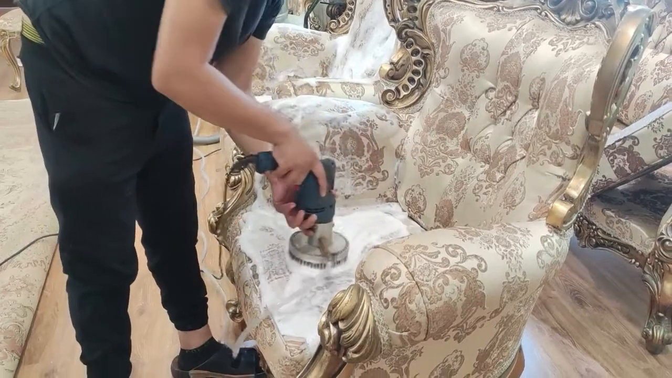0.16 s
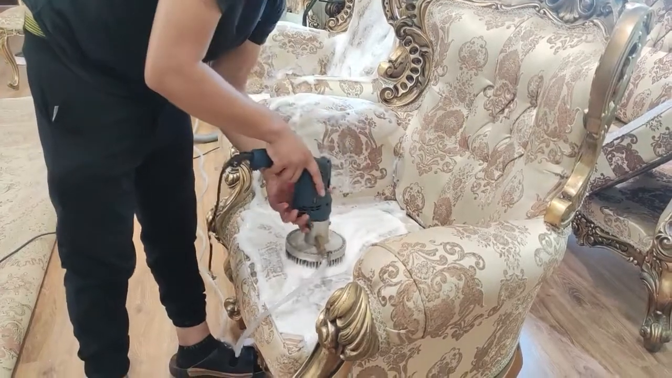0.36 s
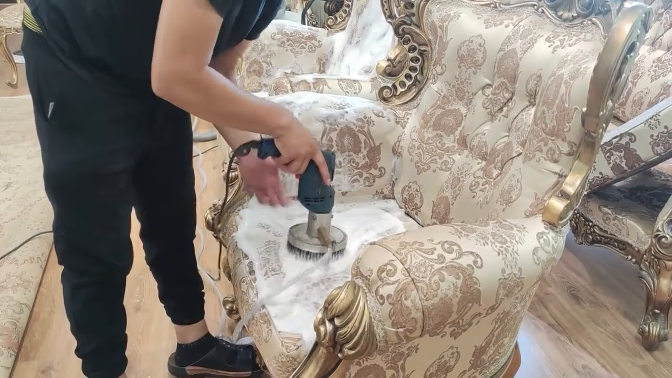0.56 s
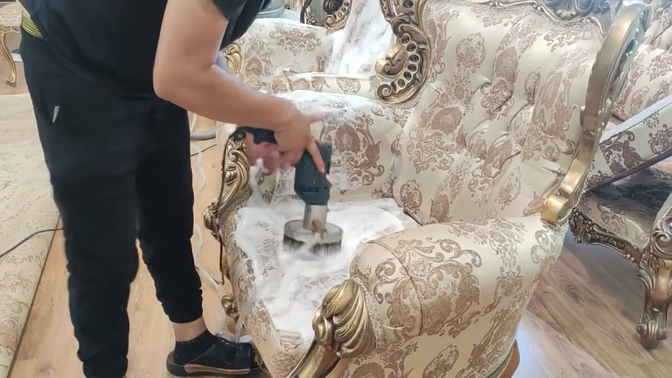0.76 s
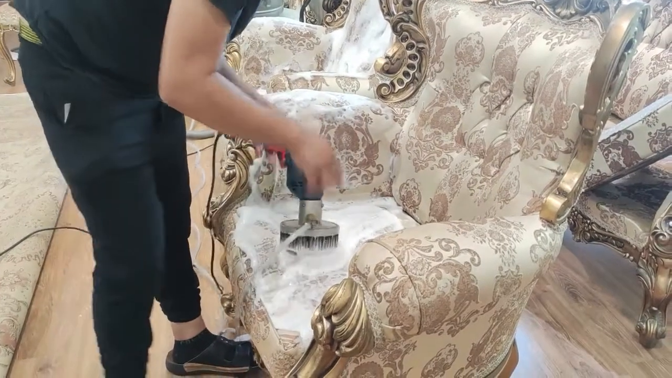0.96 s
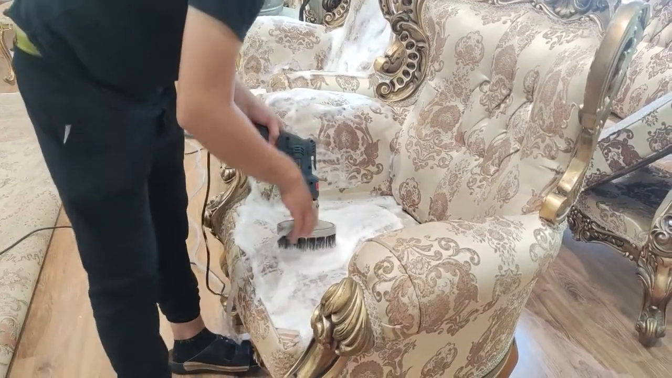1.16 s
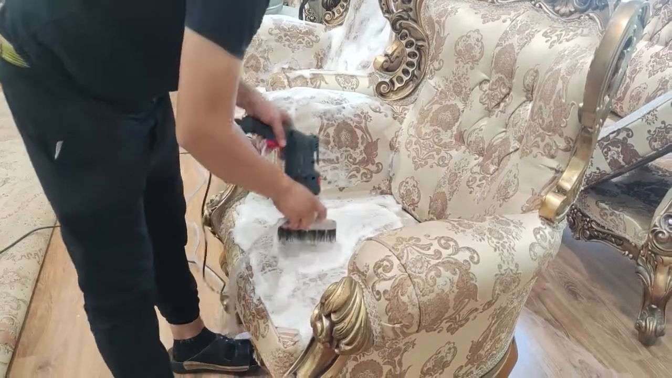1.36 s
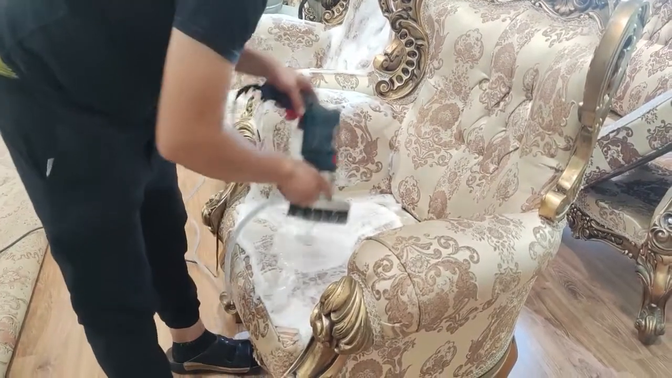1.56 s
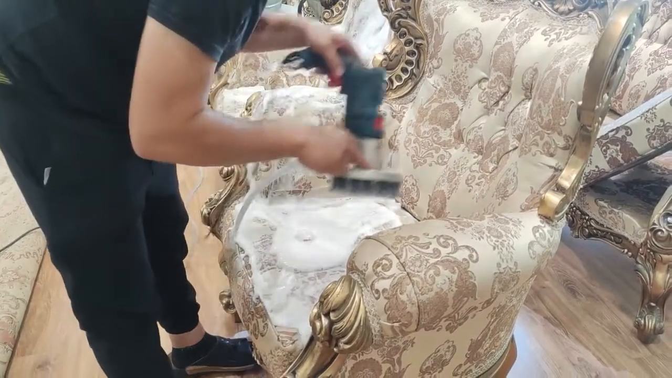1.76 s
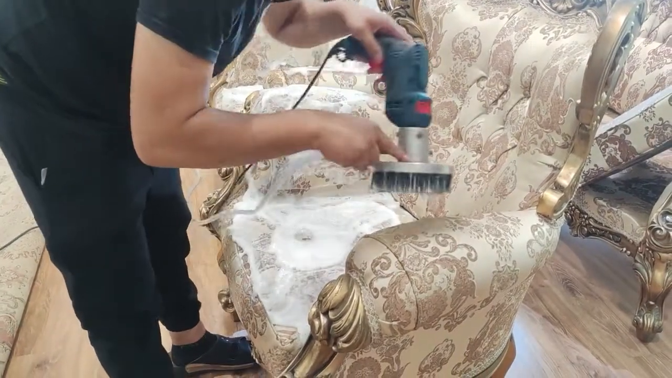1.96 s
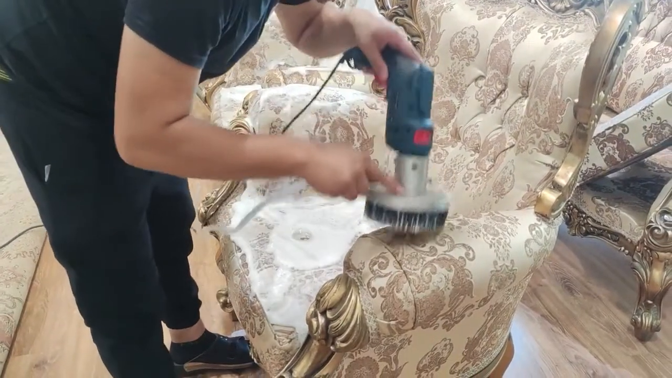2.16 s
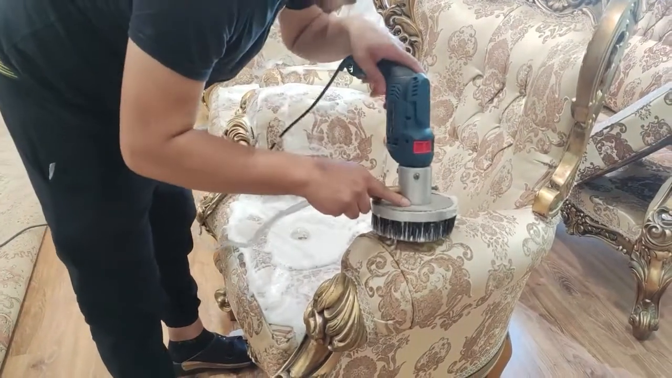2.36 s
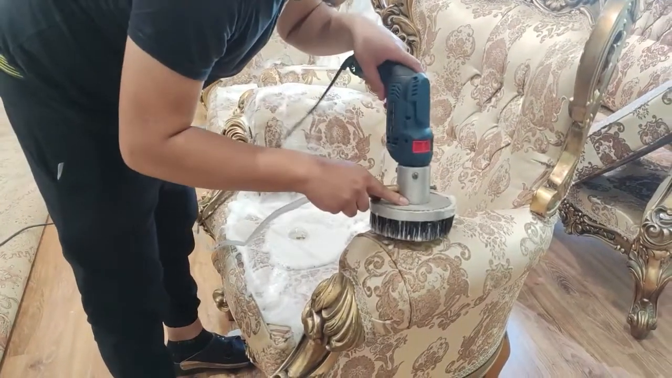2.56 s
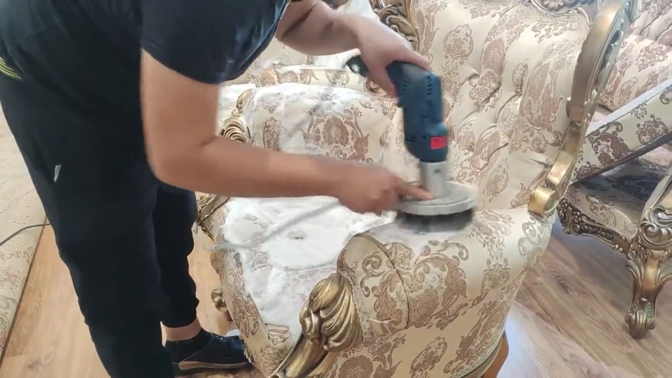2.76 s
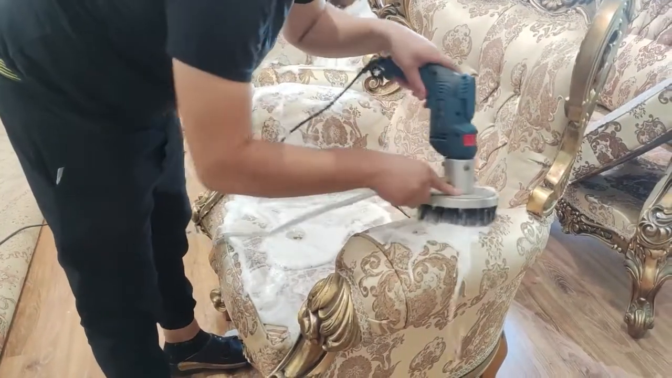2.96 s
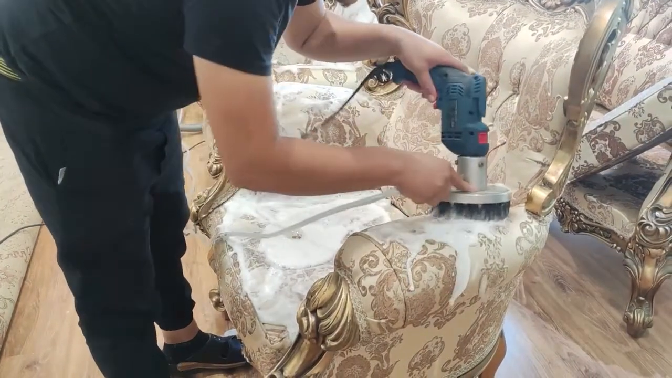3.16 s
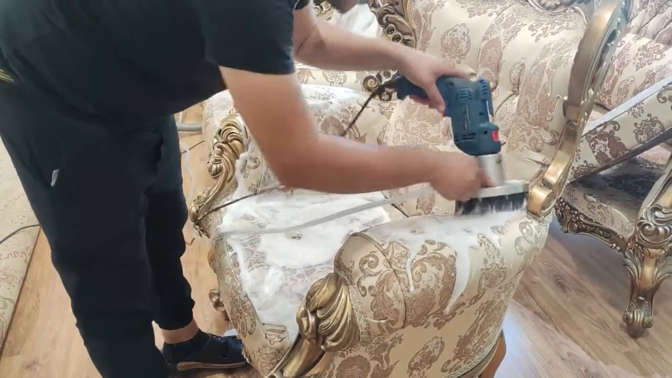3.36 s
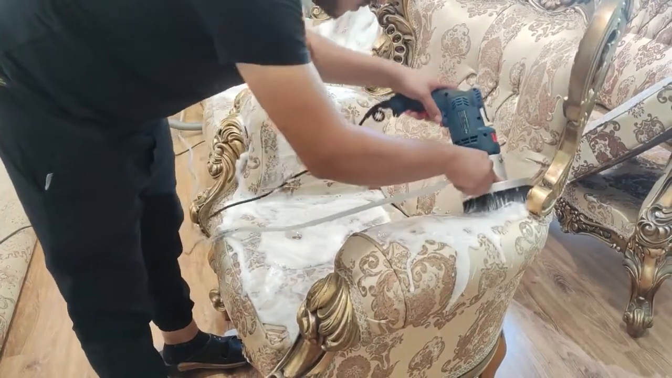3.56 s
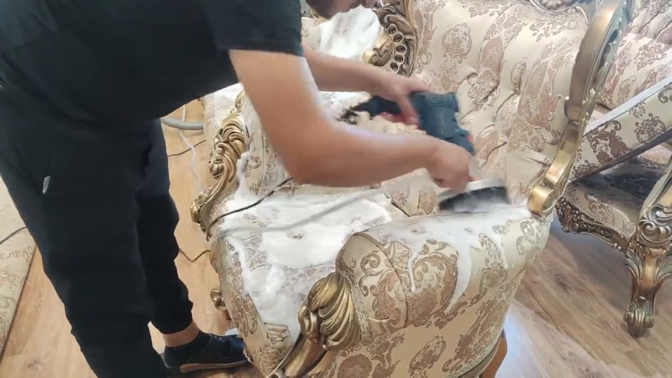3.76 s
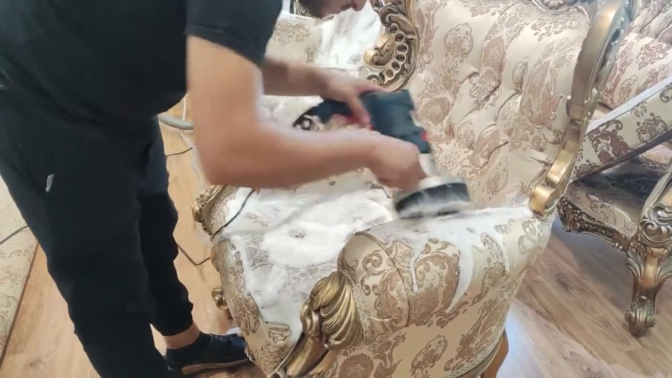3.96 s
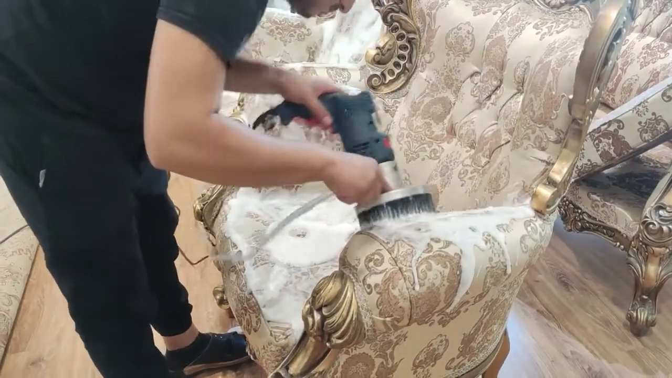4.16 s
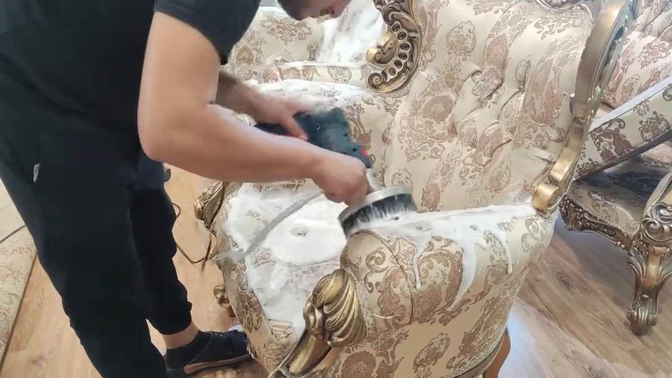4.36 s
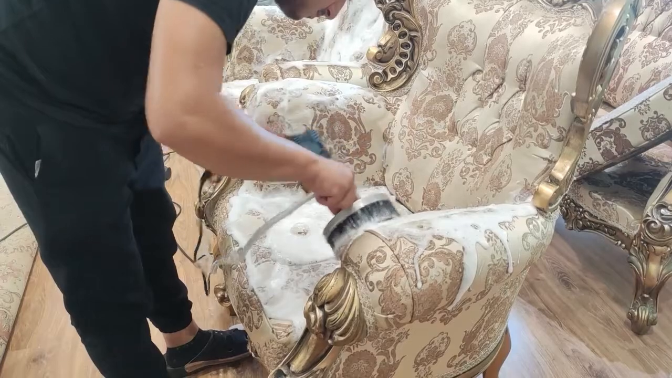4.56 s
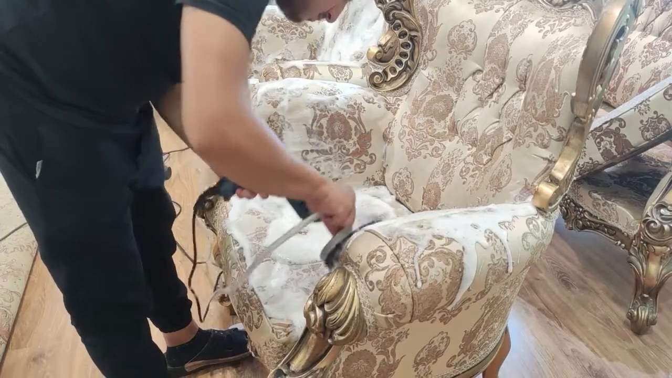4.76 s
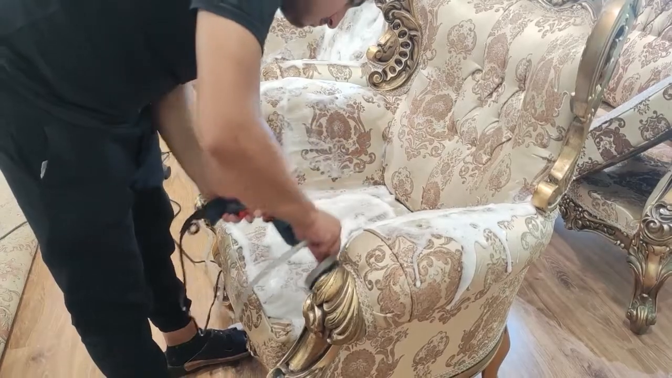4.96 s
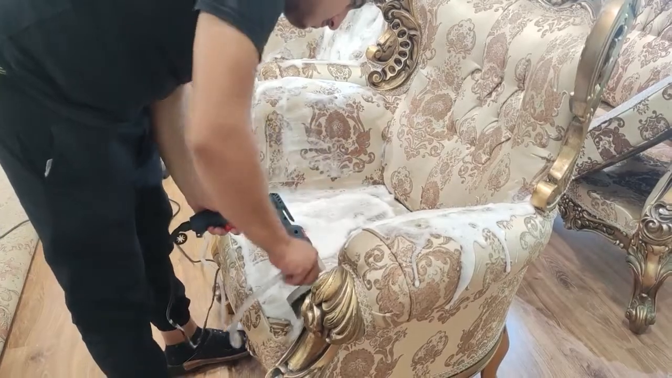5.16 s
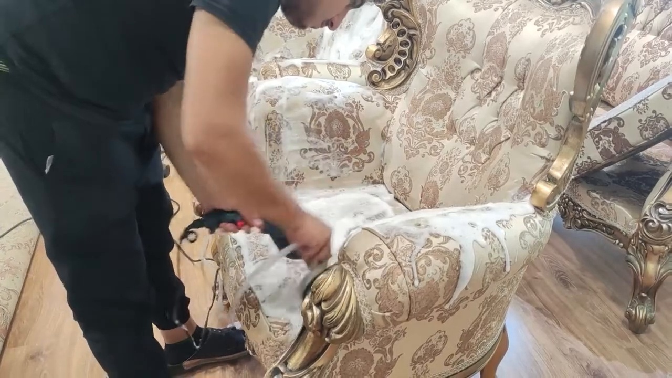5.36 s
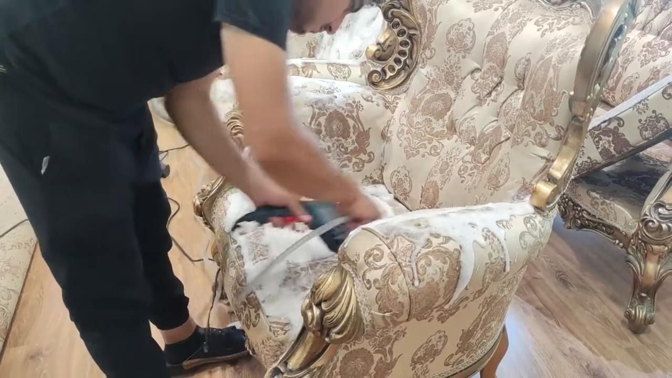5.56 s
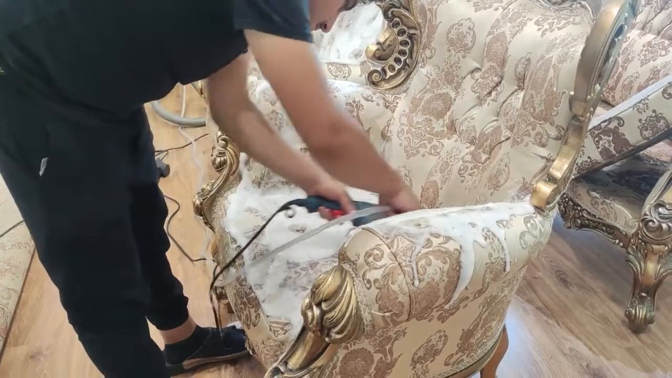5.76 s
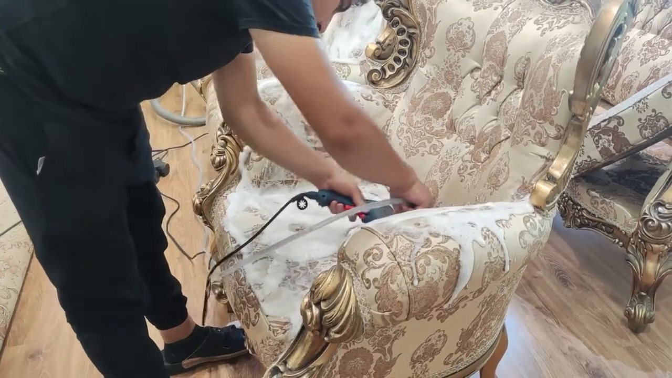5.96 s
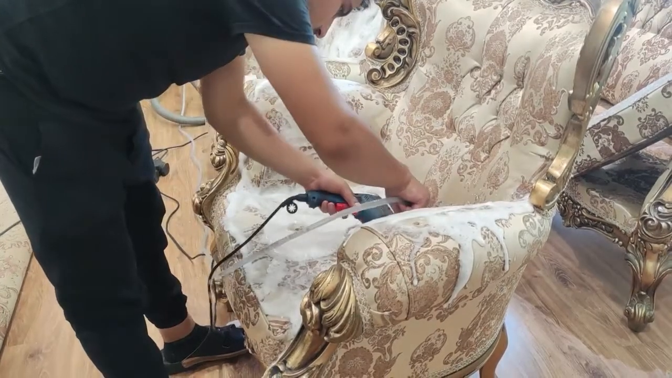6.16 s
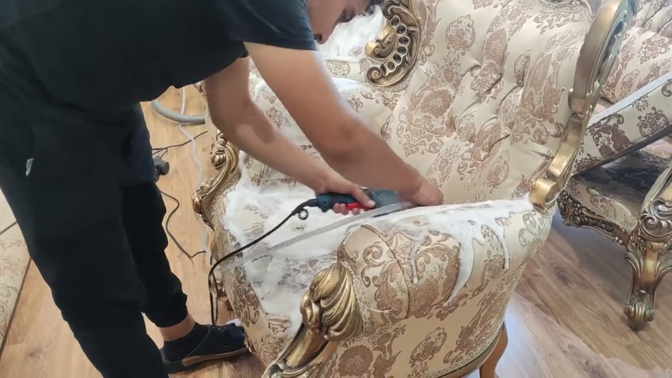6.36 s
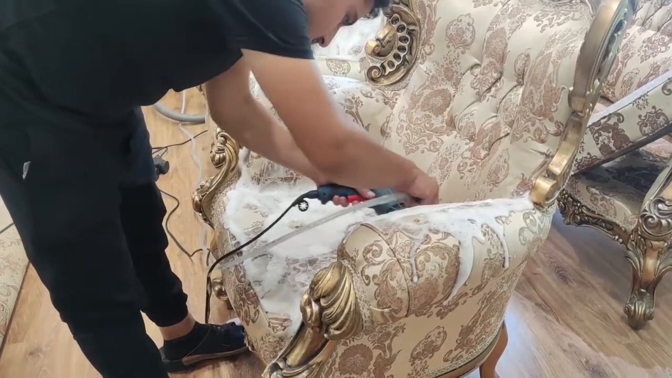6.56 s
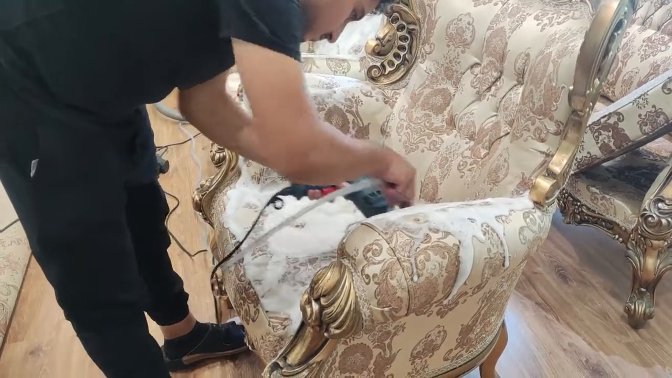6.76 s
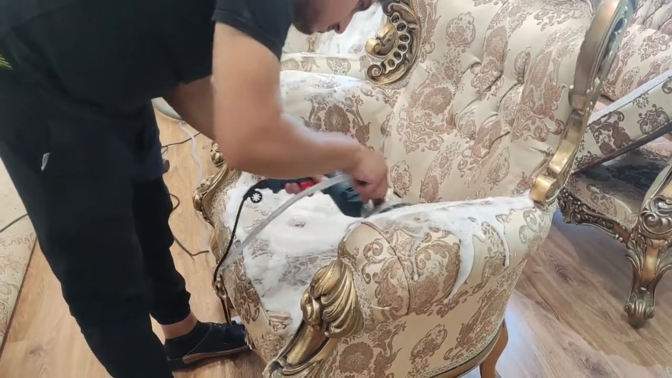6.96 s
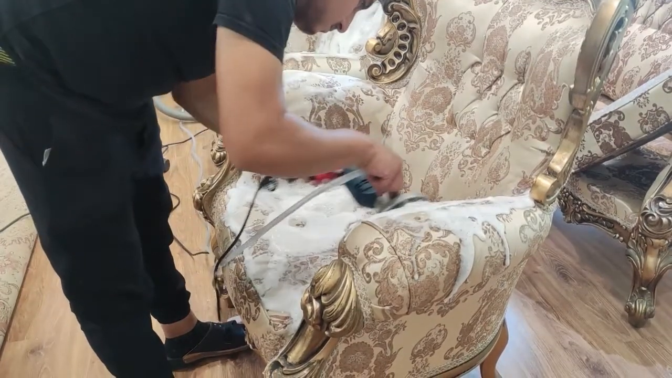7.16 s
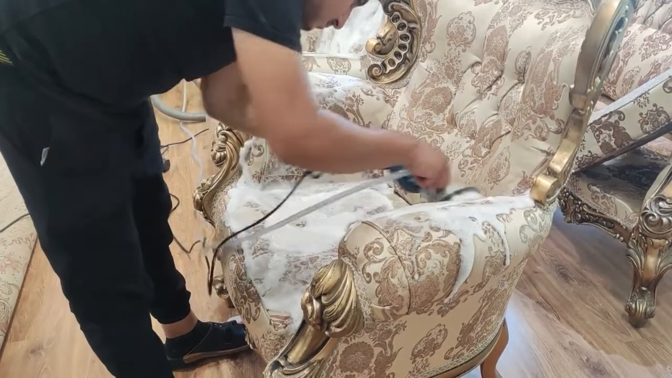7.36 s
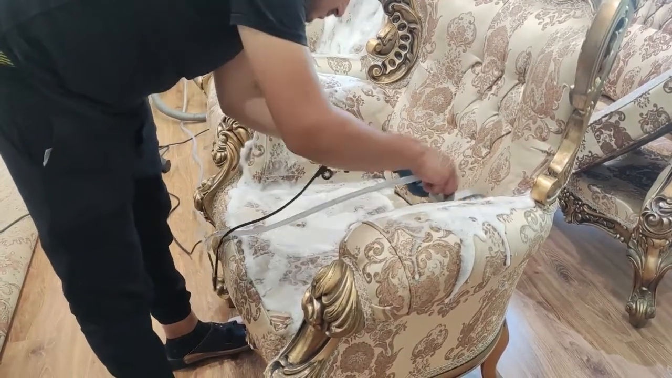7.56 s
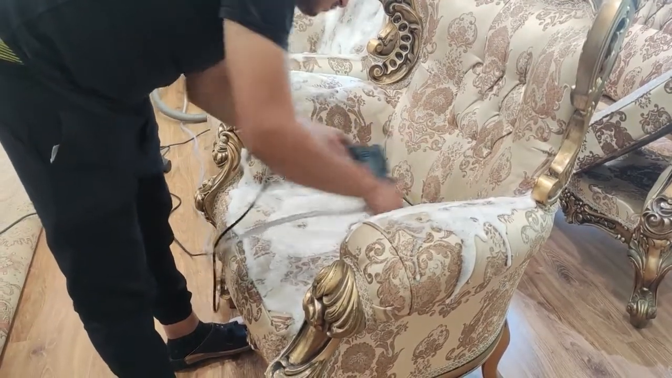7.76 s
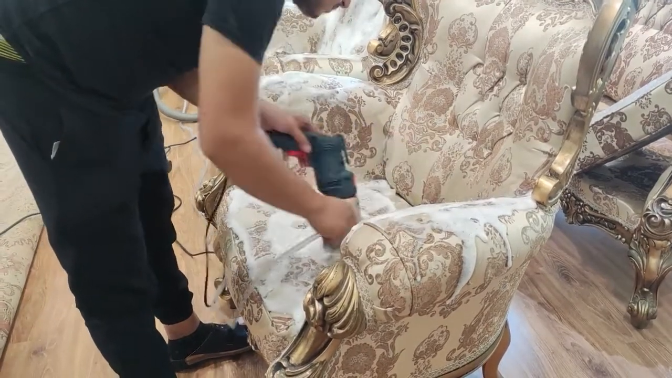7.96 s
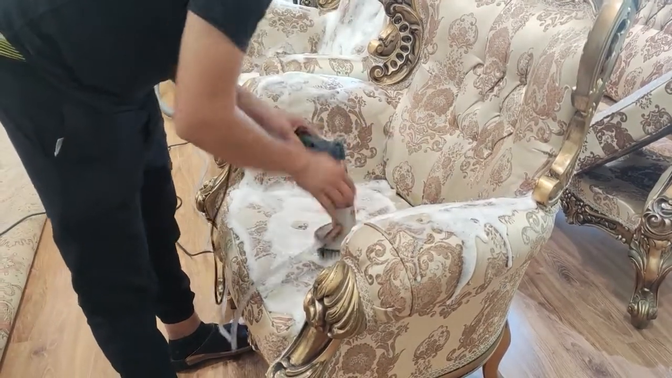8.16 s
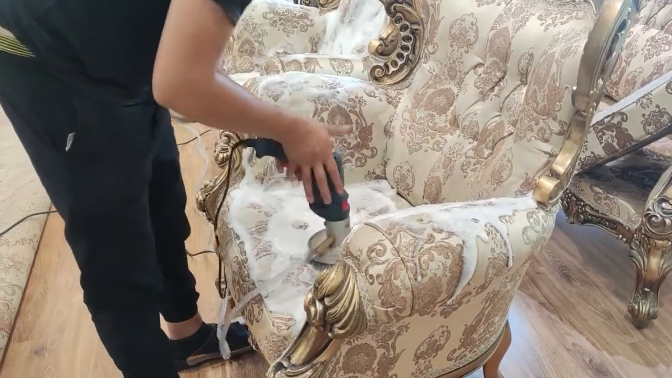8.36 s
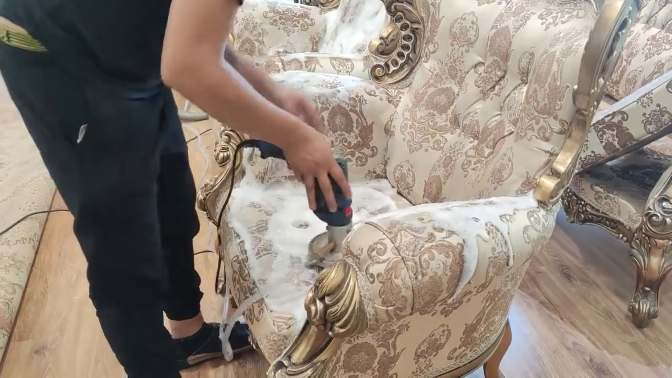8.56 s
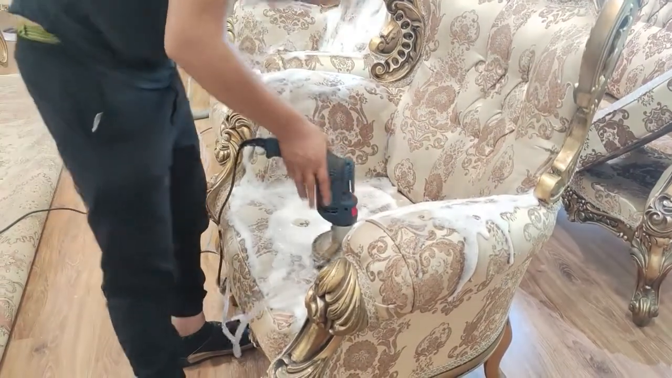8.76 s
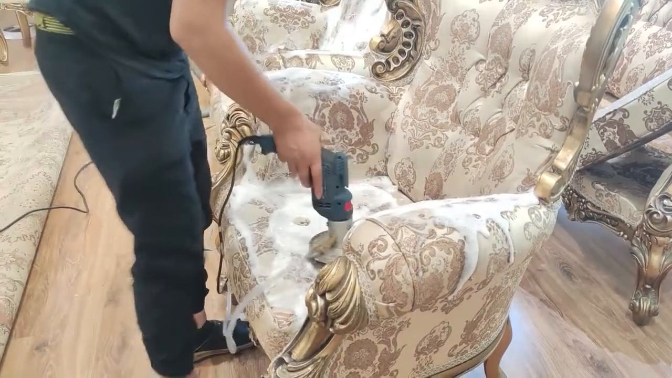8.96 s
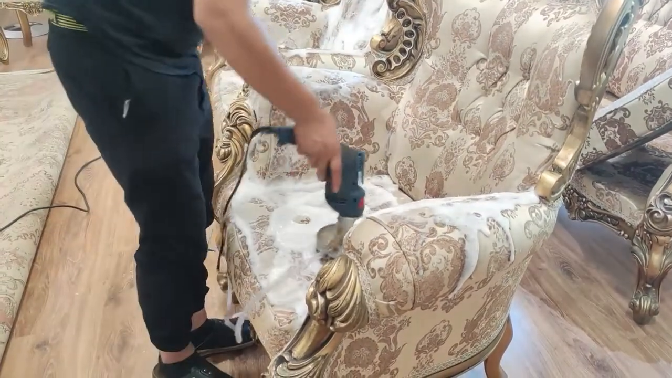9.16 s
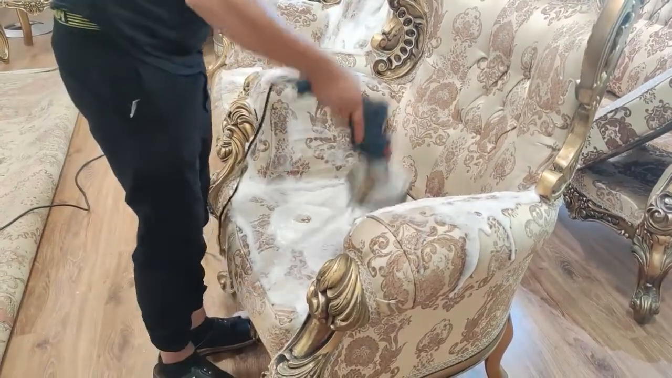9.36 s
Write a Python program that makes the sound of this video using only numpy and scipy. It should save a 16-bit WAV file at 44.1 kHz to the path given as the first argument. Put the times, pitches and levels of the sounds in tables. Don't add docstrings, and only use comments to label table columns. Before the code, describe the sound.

Close whirring electric drill with rough gear whine and bristle hiss slows to rest, pauses, starts again, wavers in pitch and finally coasts out.

```python
import sys
import numpy as np
from scipy import signal
from scipy.fft import rfft, irfft
from scipy.io import wavfile
from scipy.ndimage import uniform_filter1d

SR = 44100
rng = np.random.default_rng(int(sys.argv[2]) if len(sys.argv) > 2 else 0)


def dump_mix(stems):
    frames = np.atleast_2d(stems).T
    limited = np.clip(frames, -1, 1)
    pcm = np.round(limited * 32767).astype(np.int16)
    wavfile.write(sys.argv[1], SR, pcm)


def field_ratio(decibels):
    return 10 ** (np.asarray(decibels, dtype=float) / 20)


N = 414540

# t/s, angle/turns
TIGHT_SPOT = [(0, .43), (.7, .41), (1.3, .27), (3.2, -.11), (5, .08), (6.1, .08), (7, .3), (8.7, .4)]
# f/Hz, level/dB per Hz
HISS_SPECTRUM = [(410, -52), (700, -21), (850, -16.5), (956, -12), (1090, -12.5), (1410, -8), (1810, -5),
                 (3110, -8.5), (5440, -7), (7720, 0), (11100, -17), (13700, -17), (15600, -24.5)]
# f/Hz, level/dB per Hz
CUSHION_SPECTRUM = [(24, -43), (40, -18), (204, -12), (330, -2.5), (521, -7), (694, -3.5), (843, -4),
                    (900, -10), (1170, -33), (1980, -120)]
# f/Hz, width/Hz, level/dB
HOUSING_MODES = [(720, 227, -9), (1024.6, 90, 2.5), (1100, 206, 5.5), (1258, 29, 5.5), (1490, 270, -24)]
# f/Hz, level/dB
FAR_HUM = [(279.9, -61.5), (705.2, -71), (753.7, -79.5), (893.6, -76.5)]
# t/s, peak level/dB, ring f/Hz, t60/s
HANDLING_KNOCKS = [(0.019, -43.5, 110, .9), (2.75, -45.5, 90, 0.54), (1.69, -52, 1620, 0.068),
                   (2.002, -51, 306, 0.45), (2.033, -49.5, 1800, 0.14), (2.258, -43.5, 840, 0.22),
                   (2.321, -49, 1100, 0.16), (3.403, -39, 331, 0.19), (3.411, -30.5, 110, 0.21),
                   (3.448, -39, 60, .35), (9.091, -49, 4560, 0.042), (1.787, -55, 7500, 0.066),
                   (2.335, -49, 4320, .12), (2.083, -56.5, 2320, 1), (2.646, -45, 4200, 0.054),
                   (9.028, -76, 2240, 0.16), (9.18, -58, 7500, .4), (9.22, -58.5, 2300, 0.3)]
# f/Hz, correlation/-1 to 1
STEREO_LIKENESS = [(30, .68), (70, .92), (300, .94), (640, .82), (1400, .55), (2800, .25), (5000, -.1),
                   (15000, 0)]
# f/Hz, left minus right level/dB
PORT_DIFFERENCE = [(60, 0.0), (99, -0.5), (160, -0.5), (270, 0.0), (450, 0.5), (740, 0.5), (1220, 0.0),
                   (2010, 0.0), (3330, -3.0), (5500, -2.0), (9080, 5.5), (15000, -3.0)]
# multiple of mesh, level/dB against the third overtone
GEAR_ORDERS = [(4, -4), (5, -6), (.25, -17), (.75, -13), (1.25, -16)]
# multiple of mesh, level/dB against the commutator
ROTOR_ORDERS = [(12, -2), (8.5, -11), (9, -18)]
# f/Hz, level/dB
SHELL_RADIATION = [(40, -40), (160, -4), (300, 0), (550, -4), (870, -14), (970, 0), (9200, 0), (11000, -9),
                   (16000, -17)]
# f/Hz, level/dB per Hz
ROOM_AIR = [(15, 14.5), (40, 4.5), (200, 0), (420, -5), (800, -7), (1500, -15), (3000, -19), (5500, -22),
            (8000, -17), (10500, -29.5), (15500, -21)]
# t/s, mesh f/Hz headed for (below zero: friction braking a coast), lag/s
TRIGGER_CHANGES = [(0.0, 1736.0, 0.107), (0.247, -580.0, 0.962), (0.5, 783.0, 1.048),
                   (0.608, -693.0, 1.114), (2.635, 6809.0, 2.014), (2.814, 1036.0, 0.146),
                   (3.34, 1130.0, 0.126), (3.642, 1815.0, 2.014), (3.955, 1231.0, 2.014),
                   (4.105, 1718.0, 0.679), (4.524, 1603.0, 2.014), (4.764, 1788.0, 0.57),
                   (5.319, 2525.0, 2.014), (5.523, 1507.0, 2.014), (5.898, 861.0, 0.413),
                   (6.428, 2345.0, 2.014), (6.513, 2017.0, 0.325), (6.671, 943.0, 0.352),
                   (6.91, 4149.0, 2.014), (7.103, -577.0, 1.951), (7.212, -642.0, 1.444),
                   (7.582, 6606.0, 2.014), (7.69, 2038.0, 0.16), (7.757, -570.0, 2.014),
                   (8.147, -1244.0, 1.994), (8.44, -2532.0, 2.014)]
# t/s, level facing the microphone/dB, level of loose teeth/dB
DRILL_HOLD = [(0, 4, -19), (.3, 4, -13.5), (.5, -1.5, -17), (1.0, 3, -5.5), (1.45, -2, -3.5), (2.7, 1, 7),
              (3.1, -1, 3.5), (3.6, -1, 7.5), (4.15, 0.5, 6.5), (4.4, 0, -1.5), (5.1, 0, 5), (5.9, 0, -4.5),
              (6.4, -3.5, 3.5), (6.7, -2, -2), (7.5, -0.5, -4.5), (7.8, -1, 6.5), (8.2, -2.5, 9.5),
              (8.6, 2, -8)]
# t/s, length/s, level/dB
CLOTH_RUSTLES = [
    (2.0, 0.34, -71.5),
    (2.25, .24, -62),
    (8.844, 0.41, -61.5),
]
# t/s, pressed teeth level/dB, hammering teeth level/dB, throb depth/0-1
GEAR_SEATING = [(0, -3, -7, 0.5), (.58, -5, 3.5, .85), (.85, -7, 2, 0.4), (1.3, -5.5, -3.5, .55),
                (3.15, -9, 2.5, 0.5), (3.4, -1.5, -1.5, 0.72), (3.85, 3.5, 1, 0.5), (4.0, -6.5, -2.5, 0.43),
                (4.6, -2.5, -3.5, 0.53), (5.3, -10.5, -9.5, 0.39), (5.75, -6, -1.5, 0),
                (6.24, -9, -6.5, 0.5), (6.45, -4.5, -8.5, 0.3), (7.5, -7, -0.5, 0.4), (7.9, -12, -27, 0.2),
                (8.2, -10, 1.5, 0), (8.4, -6.5, -0.5, .2), (8.65, -9.5, -1.5, 0.5)]
# f/Hz, width/Hz, lift level/dB
GEARBOX_RINGS = [(390, 74, 5.5), (700, 310, -12), (1020, 180, 10.5), (1120, 160, 3.5), (1203, 35, -3),
                 (1490, 120, 1), (1750, 130, 0.5), (1986, 85, 2.5), (3434, 450, 2), (4960, 290, 1.5),
                 (7640, 1300, 4), (10000, 2500, -7)]

GEAR_TEETH, BARS_PER_TOOTH, MAINS_KICK_HZ = 46, 6, 100
FULL_HZ, START_HZ, REST_HZ, POWERED_HZ, GRIP_S = 1700, 1700, 5, 800, .03
MESH_DB, SECOND_DB, THIRD_DB, GEAR_FALL_DB, UPPER_FALL_DB = -21.5, -31.5, -34, 8.5, 7
BARS_DB, BARS_FALL_DB, BARS_COAST_DB = -36, 3.5, 1
RATTLE_DB, RATTLE_FALL_DB = -32, 5
HISS_DB, HISS_FALL_DB, SPARK_DB, SPARK_FULL_HZ = -26, 8, -42, 300
BRIGHT_DB, BRIGHT_FALL_DB = -3, -0.5
RUMBLE_DB, RUMBLE_FALL_DB, COAST_DB, RUMBLE_LOOSE = -38, 8, -2, 0.17
DRAG_DB, DRAG_FULL_HZ, DRAG_DULL_DB = -47.5, 220, -7.5


def evened(x):
    return x / np.sqrt(np.mean(x ** 2) + 1e-20)


def read(points, hz):
    f, value = np.transpose(points)
    return np.interp(np.log(hz + 1), np.log(f + 1), value)


def curves(rows):
    s, *columns = np.transpose(rows)
    return [np.interp(np.arange(N) / SR, s, c) for c in columns]


def resonate(x, hz, width):
    return signal.lfilter(*signal.iirpeak(hz, hz / width, SR), x)


def drift(hz):
    return evened(signal.lfilter(*signal.butter(2, float(hz), fs=SR), rng.standard_normal(N)))


def noise(shape, patchy_db, tilt_db=0., size=512):
    hop, hz = size // 4, np.fft.rfftfreq(size, 1 / SR)
    frames = N // hop + 5
    a, b, c, d, patches = rng.standard_normal((frames, len(hz), 5)).T
    patches = uniform_filter1d(patches, size=6, axis=0)
    patches = evened(uniform_filter1d(patches, size=8192 // size, axis=1))
    same = np.clip(read(STEREO_LIKENESS, hz), -1, 1)[:, None]
    left = a + 1j * b
    right = same * left + np.sqrt(1 - same ** 2) * (c + 1j * d)
    z = np.array([left, right]) * field_ratio(read(shape, hz))[:, None]
    tilt = np.interp(np.arange(frames) * hop, np.arange(N), tilt_db * np.ones(N))
    treble = np.clip(hz / 1500 - 3, 0, 1)[:, None]
    field = field_ratio(patchy_db * patches + treble * tilt)
    plain, shaped = signal.istft(np.array([z, z * field]), nperseg=size, noverlap=size - hop)[1][..., :N]
    return shaped / plain.std()


def quiet():
    t = np.arange(N) / SR
    hum = sum(field_ratio(db + 1.4 * drift(6)) * np.sin(2 * np.pi * hz * t) for hz, db in FAR_HUM)
    return field_ratio(-56.5) * noise(ROOM_AIR, patchy_db=2.5, size=2048) + np.sqrt(2) * hum


def room(x, t60=0.43):
    taps = np.zeros((2, SR // 2))
    at = np.arange(200, SR // 2 - 20, 20) + rng.integers(0, 20, (2, (SR // 2 - 201) // 20))
    np.put_along_axis(taps, at, rng.choice([-1., 1.], at.shape), 1)
    decay = field_ratio(-np.arange(SR // 2) / SR / t60 * 60)
    tail = signal.lfilter([1], [1, -.35], taps) * decay
    return signal.fftconvolve(x[None], tail / np.linalg.norm(tail[0]), axes=1)[:, :N]


def handling():
    out, t = np.zeros(N), np.arange(SR // 3) / SR
    puffs = rng.standard_normal((len(HANDLING_KNOCKS), len(t)))
    for (s, db, hz, t60), puff in zip(HANDLING_KNOCKS, puffs):
        part = out[round(s * SR):][:len(t)]
        envelope = field_ratio(db - 60 * t / t60) * np.minimum(t / .0015, 1)
        part += (envelope * evened(resonate(puff, hz, 0.56 * hz)))[:len(part)]
    return out


def speed():
    t, hz = np.arange(N) / SR, START_HZ
    ends = [row[0] for row in TRIGGER_CHANGES[1:]] + [N / SR]
    mesh, powered = np.zeros((2, N))
    for (s, goal, lag), end in zip(TRIGGER_CHANGES, ends):
        now = slice(round(s * SR), round(end * SR))
        mesh[now] = np.maximum(goal + (hz - goal) * np.exp((s - t[now]) / lag), REST_HZ)
        powered[now] = goal > POWERED_HZ
        hz = mesh[now][-1]
    return uniform_filter1d([mesh, powered], size=round(GRIP_S * SR), mode="nearest")


def halvings(mesh):
    return np.log2(FULL_HZ / mesh) + 4 * np.clip(1 - mesh / 60, 0, 1)


def brush(gate):
    t, (mesh, powered), (facing_db, loose_db) = np.arange(N) / SR, speed(), curves(DRILL_HOLD)
    slow = halvings(mesh)
    rustle = sum(field_ratio(db) * np.sin(np.pi * np.clip((t - s) / length, 0, 1) ** 1.1)
                 for s, length, db in CLOTH_RUSTLES)
    sparks = powered * field_ratio(SPARK_DB) * np.minimum(mesh / SPARK_FULL_HZ, 1) ** 2
    air = field_ratio(facing_db) * np.hypot(field_ratio(HISS_DB - HISS_FALL_DB * slow), sparks) + rustle
    drag = np.clip((mesh - REST_HZ) / DRAG_FULL_HZ, 0, 1)
    air = np.hypot(air, field_ratio(DRAG_DB) * drag)
    dull_db = DRAG_DULL_DB * drag ** .2 * np.clip(slow / 2 - 1, 0, 1)
    tilt_db = BRIGHT_DB - BRIGHT_FALL_DB * np.minimum(slow, 5) + dull_db
    flicks = (rng.random(N) < 240 / SR) * rng.exponential(0.1, N)
    flicks = 1 + signal.lfilter([1], [1, -.99], flicks)
    hiss = noise(HISS_SPECTRUM, patchy_db=1.35, tilt_db=tilt_db) * evened(gate * flicks)
    rumble_db = RUMBLE_DB + RUMBLE_LOOSE * loose_db - RUMBLE_FALL_DB * slow + COAST_DB * (1 - powered)
    rumble = field_ratio(rumble_db) * noise(CUSHION_SPECTRUM, patchy_db=3.0, size=2048)
    return field_ratio(8.0) * air * hiss + rumble


def lift(hz):
    return sum(db * np.exp(-((hz - centre_hz) / width) ** 2) for centre_hz, width, db in GEARBOX_RINGS)


def tooth_rattle(knocks):
    rattle = sum(field_ratio(db) * resonate(resonate(knocks, hz, w), hz, w) for hz, w, db in HOUSING_MODES)
    return rattle / np.sqrt(abs(uniform_filter1d(rattle ** 2, size=9000)) + 1e-7)


def drill():
    mesh, powered = speed()
    slow = halvings(mesh)
    teeth = np.cumsum(mesh) / SR
    tooth = teeth.astype(int)
    (facing_db, loose_db), (pressed_db, hammer_db, depth) = curves(DRILL_HOLD), curves(GEAR_SEATING)
    upper_db = facing_db + hammer_db - UPPER_FALL_DB * slow
    mesh_db = MESH_DB + facing_db + pressed_db - GEAR_FALL_DB * slow
    second_db, third_db = SECOND_DB + upper_db, THIRD_DB + upper_db
    bars_db = BARS_DB + facing_db - BARS_FALL_DB * slow + BARS_COAST_DB * (1 - powered)
    rattle_db = RATTLE_DB + loose_db - RATTLE_FALL_DB * slow

    turn = np.cos(2 * np.pi * (teeth / GEAR_TEETH + curves(TIGHT_SPOT)[0]))
    flaw = rng.standard_normal(GEAR_TEETH)[tooth % GEAR_TEETH]
    errors = uniform_filter1d(flaw, size=170)
    throb = 1 + np.clip(1.25 * depth, 0, 1) * (turn + .5 * turn ** 2 - .25) + .35 * errors
    throb_gain = np.sqrt(abs(throb))
    slack = .022 * drift(50) + .035 * errors

    kick = np.exp(-(np.arange(N) * MAINS_KICK_HZ / SR % 1) / 0.16)
    pull = np.clip(np.gradient(mesh) * SR / 500 - 1.5, 0, 1)
    pull = uniform_filter1d(pull, size=4000, origin=1600)
    slack += pull * (.3 * kick + .22 * drift(140))
    wander = .02 * drift(70)
    gear_flutter_db, rotor_flutter_db = .8 * drift(4.7), 1.8 * drift(30)

    def tone(multiple, db, shift):
        ring_db = np.repeat(lift(multiple * mesh[::64]), 64)[:N]
        phase = 2 * np.pi * (multiple * (teeth + shift) + rng.random())
        return np.sqrt(2) * field_ratio(db + ring_db) * np.cos(phase)

    gears = throb_gain * tone(1, mesh_db, slack)
    gears += tone(2, second_db, .7 * slack) + tone(3, third_db, .6 * slack)
    gears += sum(tone(k, third_db + db, slack / 2) for k, db in GEAR_ORDERS)
    gears *= throb_gain * (1 + 0.77 * pull * (kick - .2)) * field_ratio(gear_flutter_db)

    slow_db = 40 * np.log10(np.clip(mesh / 480, .01, 1))
    rotor = tone(BARS_PER_TOOTH, bars_db + slow_db, wander)
    rotor += sum(tone(k, bars_db + db + slow_db / 2, wander / 2) for k, db in ROTOR_ORDERS)
    rotor *= field_ratio(rotor_flutter_db)

    knocks = np.diff(tooth, prepend=0) * (flaw + .9 * rng.standard_normal(N))
    knocks = knocks * (1 + depth * turn) * (1 + .5 * kick)
    tones = gears + rotor + field_ratio(rattle_db) * tooth_rattle(knocks)
    tones = irfft(rfft(tones) * field_ratio(read(SHELL_RADIATION, np.fft.rfftfreq(N, 1 / SR))), N)
    return tones, (1 + 0.017 * turn) * (1 + 0.064 * kick)


def scene():
    tones, gate = drill()
    near = tones + handling()
    return field_ratio(-1) * near + field_ratio(-7) * room(near) + brush(gate) + quiet()


def top_cut(x):
    return signal.sosfilt(signal.butter(12, 15710, fs=SR, output="sos"), x)


def record(dry):
    lean = read(PORT_DIFFERENCE, np.fft.rfftfreq(N, 1 / SR)) / 2
    ported = irfft(rfft(dry) * field_ratio(np.array([lean, -lean])), N)
    return top_cut(ported)


dry = scene()
out = record(dry)
dump_mix(out)
```